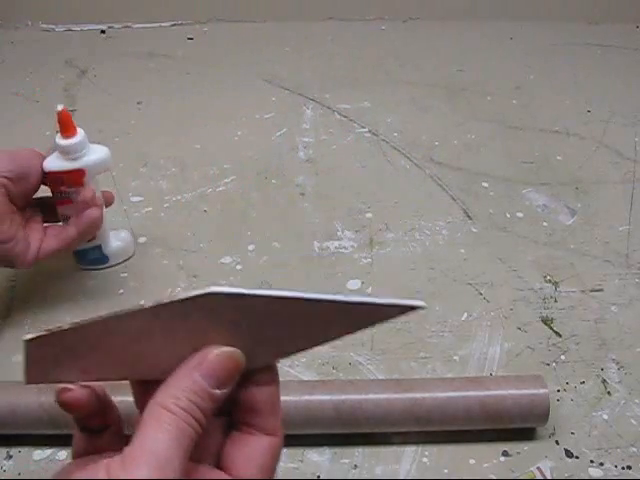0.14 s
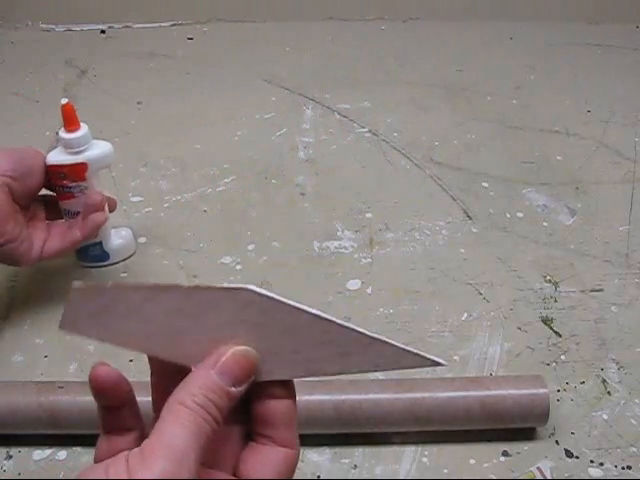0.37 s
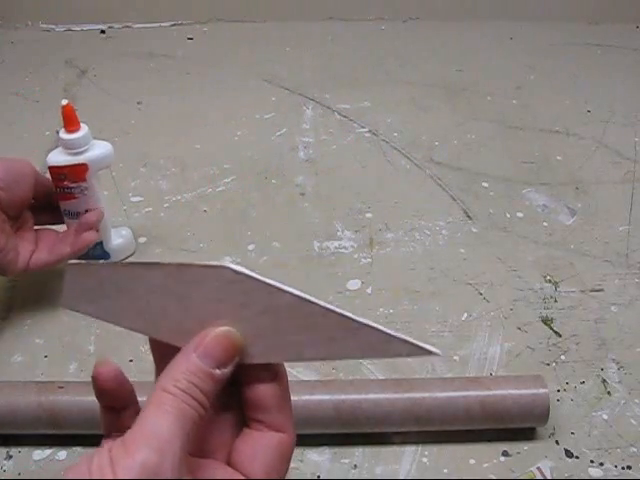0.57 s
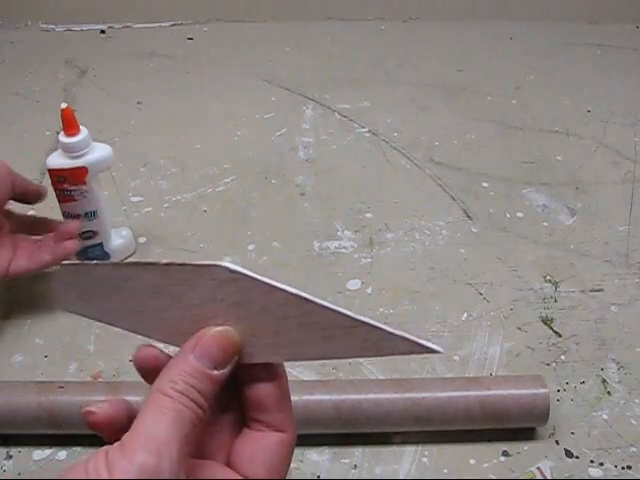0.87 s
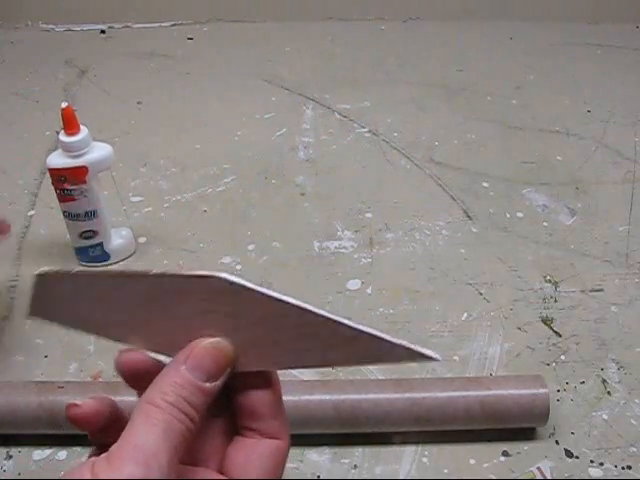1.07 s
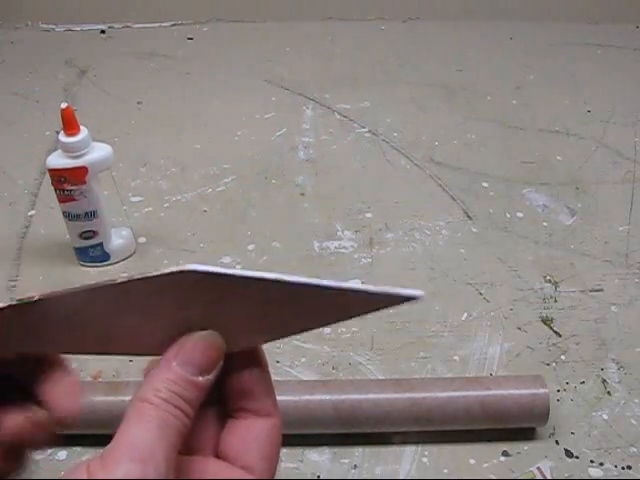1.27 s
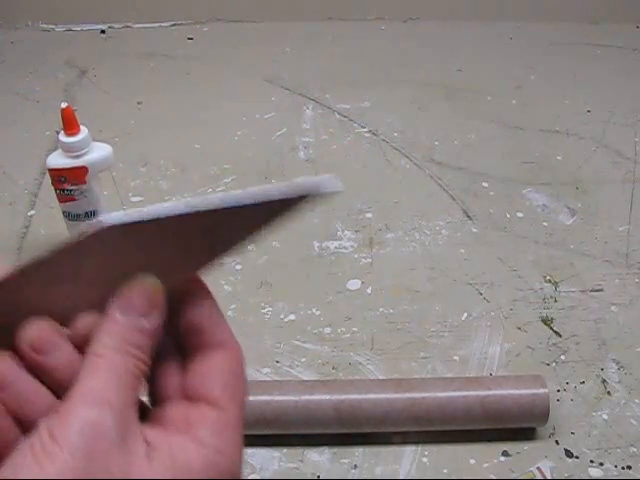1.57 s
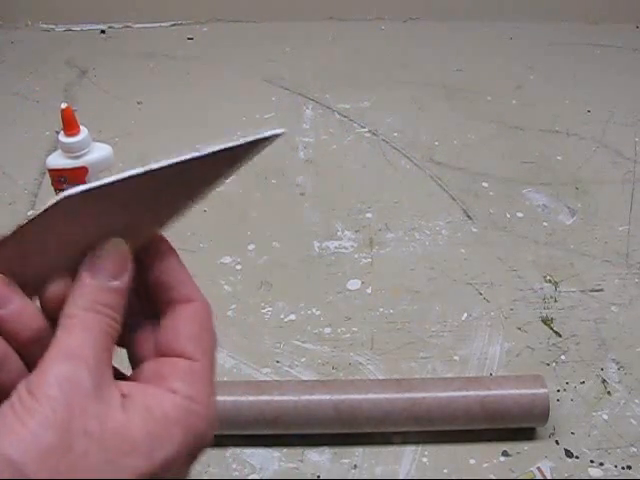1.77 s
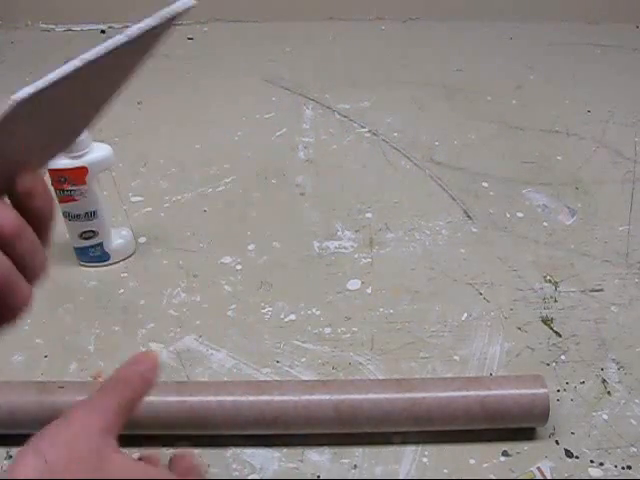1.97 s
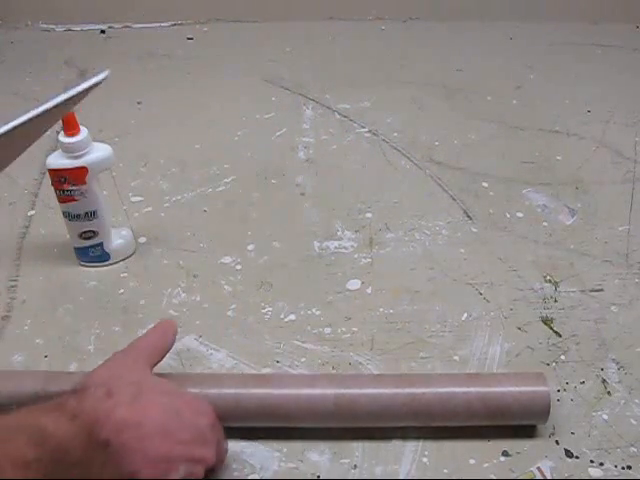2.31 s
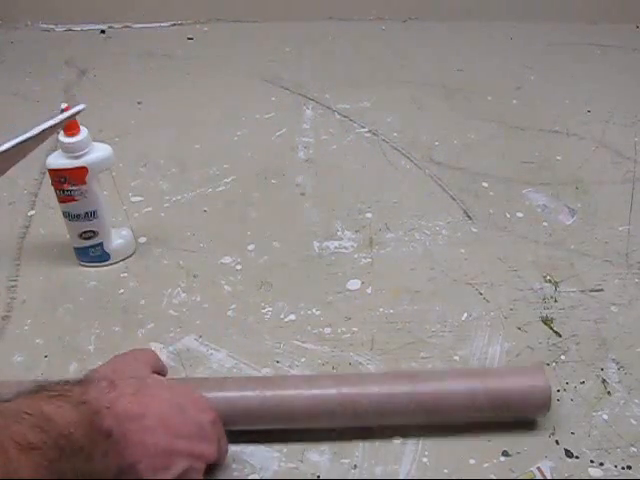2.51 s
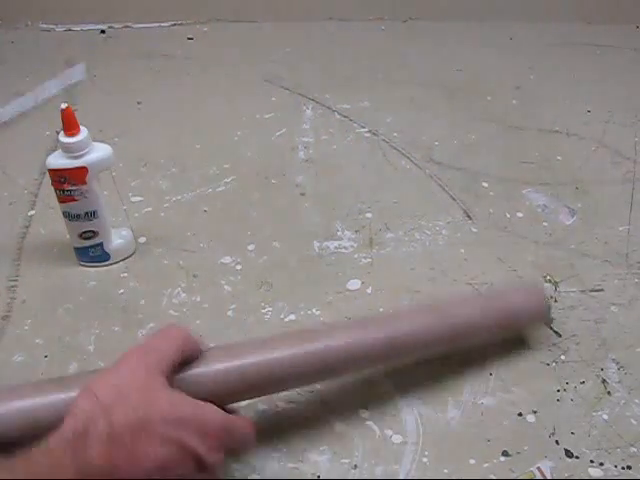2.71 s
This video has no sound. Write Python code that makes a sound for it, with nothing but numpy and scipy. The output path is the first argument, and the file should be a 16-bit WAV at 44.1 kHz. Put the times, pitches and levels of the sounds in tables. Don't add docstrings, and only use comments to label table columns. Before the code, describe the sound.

Knocks on a hard tabletop: first a bottle set down and rocking, then small nail ticks on thin wood, then hollow tube bumps with a short scrape. Faint hum, small room, close lo-fi microphone.

```python
import sys
import numpy as np
from scipy import signal
from scipy.io import wavfile
from scipy.ndimage import uniform_filter1d

SR = 44100
rng = np.random.default_rng(int(sys.argv[2]) if len(sys.argv) > 2 else 0)


def boost_factor(decibels):
    exponent = np.asarray(decibels, float) / 20
    return 10 ** exponent


def wav_out(sig):
    wavfile.write(sys.argv[1], SR, np.round(np.clip(np.atleast_2d(sig).T, -1, 1) * 32767).astype(np.int16))


N = 125685

# (frequency [Hz], density [dB per Hz])
AIR_SPECTRUM = [(30, -0.5), (100, -4), (220, -7), (450, -0.5), (700, -5.5), (1000, -11), (1850, -10.5),
                (5000, -16)]
AIR_DB, AIR_FLICKER_DB = -51.5, 0.7
# (multiple of BUZZ_HZ [1], level [dB])
HUM_PARTIALS = [(3, -65), (4, -58.5), (5, -62.5), (6, -61), (7, -71), (9, -67)]
BUZZ_HZ = 119.93
FAN_HZ, FAN_WIDTH_HZ, FAN_DB = 1813, 130, -63.5

# (time [s], level [dB], rise [s], t60 [s], centre [Hz])
FINGER_SLIPS = [(0, -50, .002, 0.67, 3820), (0.202, -34, 0.0027, 0.3, 1600),
                (0.257, -42, 0.0057, 0.075, 4880), (0.562, -43.5, 0.0019, 0.15, 2500),
                (1.283, -43, 0.001, 0.09, 4100), (1.475, -38.5, 0.0018, 0.14, 3540),
                (1.758, -43, 0.00089, 0.035, 3540), (1.766, -51, 0.0024, 0.41, 3400),
                (1.828, -48.5, 0.013, 0.5, 3560), (1.87, -40.5, 0.006, 0.062, 3230),
                (2.209, -43.5, 0.0014, 0.11, 3290), (2.265, -43.5, 0.0079, 0.23, 4260),
                (2.4088, -33.5, 0.00086, 0.017, 3240), (2.545, -39, 0.0092, .12, 5000),
                (0.297, -46.5, .004, .06, 4500), (2.4746, -38, 0.00069, 0.07, 2750),
                (2.668, -45.5, 0.0076, 0.6, 4240)]

# (time [s], level [dB], contact [ms])
BOTTLE_HITS = [(.2028, -12.5, 1.03), (.2062, -19, 1.07), (.219, -22, 1.12), (.228, -21.5, 1.1),
               (.2455, -15.5, 2), (.259, -24.5, 0.39), (.284, -24.5, 2.08), (.32, -31, 4), (.562, -36, 1.2),
               (.62, -37.5, 1.75), (.745, -38.5, 1.06), (.765, -41, 1.37), (.79, -39, 1.46)]
# (frequency [Hz], level [dB], t60 [s])
TABLE_MODES = [(44.5, -36.5, 0.25), (92.2, -14.5, 0.15), (122.7, -5.5, 0.24), (165.4, -1, 0.17),
               (216.6, -10, 0.054), (255.3, -2, .09), (296.8, -10, 0.1), (377.4, -3, 0.082),
               (420, -4, 0.07), (512, -8, .09), (598.6, -5, 0.2), (652, -2.5, 0.096), (869, -10, 0.094),
               (1200, -5.5, 0.031)]
# (time [s], level [dB], contact [ms])
ROCKING_NUDGES = [(.308, -36, 5.2), (.34, -35.5, 5.8), (.365, -42, 5.1), (.42, -39, 4.8), (.487, -36, 5),
                  (.53, -43.5, 5.2), (.556, -39, 4.5), (.593, -31, 4.9), (.612, -37, 3.1), (.636, -41, 3.5),
                  (.672, -40.5, 4.4), (.716, -37.5, 4.9), (.742, -41, 2.7), (.759, -34, 4.2), (.785, -39, 3.2),
                  (.815, -36.5, 4.8), (.86, -42.5, 6), (.89, -44.5, 7.6), (.95, -47, 7.2)]
# (frequency [Hz], level [dB], t60 [s])
SWAY_MODES = [(48.2, -15.5, 0.25), (70, -16, 0.086), (95, 0, 0.16), (122, -3.5, .16), (168, -3, 0.1),
              (235, -1, 0.09), (330, -1, .07)]
# (time [s], level [dB], frequency [Hz], t60 [s])
TABLE_SWELLS = [(.204, -14, 385, 0.067), (0.209, -20, 168, 0.093), (.212, -27.5, 604, .1),
                (.228, -18, 252.5, 0.14), (.266, -24.5, 251.5, 0.055), (.278, -25, 165.2, 0.11),
                (.285, -35.5, 615, .09), (.315, -35, 54.7, 0.32), (0.317, -31.5, 122, 0.11),
                (.36, -40, 161.3, 0.088), (.39, -36, 117.8, 0.29), (0.753, -35.5, 340.5, .08),
                (.558, -39.5, 410.5, 0.091), (.565, -38, 235, .1), (.601, -31, 94, .17),
                (.763, -30, 96, .17)]
# (time [s], level [dB], frequency [Hz], t60 [s])
SMALL_TICKS = [
    (0.3927, -26, 410, 0.028),
    (1.2812, -30, 3500, 0.008),
    (1.2822, -31, 4500, 0.006),
    (1.76, -41, 3700, 0.0035),
    (2.473, -30, 2480, 0.013),
    (2.8, -36, 3800, 0.028),
    (2.7, -32, 1480, 0.022),
    (0.2052, -19, 1570, 0.0045),
    (2.4072, -15, 800, .006),
]

# (time [s], level [dB])
SLEEVE_LEVEL = [
    (1.65, -70),
    (1.78, -57.5),
    (1.9, -54.5),
    (2.05, -54.5),
    (2.2, -52),
    (2.4, -52),
    (2.6, -54.5),
    (2.85, -56.5),
]

# (time [s], level [dB], contact [ms])
TUBE_HITS = [(2.205, -19.5, 0.2), (2.2092, -28.5, 0.68), (2.2146, -29, 1.6), (2.2255, -22.5, 1.67),
             (2.272, -37, 0.68), (2.4073, -14, 0.25), (2.4125, -30, 1.1), (2.42, -17.5, 2.1),
             (2.435, -27.5, 1.23), (2.49, -24, 1.5), (2.535, -23.5, 1.2), (2.547, -33, 0.36),
             (2.559, -24, 0.45), (2.568, -28, 1.6), (2.583, -28, 3.7), (2.6, -29, 2.7)]
# (frequency [Hz], level [dB], t60 [s])
TUBE_MODES = [(268.6, -4, 0.06), (351.4, -1.5, 0.12), (422, -13.5, 0.074), (519, -11, 0.07),
              (630, -5, 0.058), (710, -0.5, .035), (793, -3, 0.057), (950, -3.5, 0.0084),
              (1090, -10, 0.035), (1512, -16.5, 0.035), (1575, -24.5, 0.018), (2500, -20, 0.0085),
              (3410, -48, .02)]
# (time [s], level [dB])
DRAG_PRESSURE = [(2.19, -74), (2.21, -40), (2.3, -48.5), (2.38, -43.5), (2.42, -43), (2.465, -82.5),
                 (2.49, -42), (2.52, -36), (2.562, -32.5), (2.58, -43), (2.625, -54.5), (2.74, -57.5),
                 (2.85, -44.5)]
DRAG_RATE_HZ, DRAG_SCATTER_DB, DRAG_INTO_TUBE_DB = 5400, 2, -3
# (time [s], level [dB], contact [ms])
GRIP_PUMPS = [(2.228, -39, 2.7), (2.255, -42.5, 3), (2.393, -42, 3.6), (2.432, -35.5, 1.8),
              (2.455, -44, 2.5), (2.478, -36.5, 1.9), (2.49, -33, 3.4), (2.53, -39, 2.8),
              (2.546, -34.5, 2.4), (2.558, -31, 2.6), (2.58, -34, 2.5), (2.597, -34.5, 2.8),
              (2.618, -39.5, 2.7), (2.66, -45.5, 4), (2.69, -46, 4.4)]
# (frequency [Hz], level [dB], t60 [s])
HOLLOW_MODES = [(86, -25, 0.077), (114, -13.5, 0.22), (168.9, -1.5, 0.13), (197.3, -5, 0.11),
                (239.4, -8, .08)]
TUBE_LOW_HZ, HOLLOW_LOW_HZ = 196, 88.6
# (time [s], level [dB], frequency [Hz], t60 [s])
TUBE_SWELLS = [(2.211, -27, 250, .12), (2.216, -28, 352.3, .1), (2.222, -36, 117.6, 0.27),
               (2.268, -37, 430, 0.072), (2.297, -39, 390, .12), (2.39, -39.5, 151, 0.095),
               (2.411, -26.5, 248, 0.13), (2.42, -28.5, 350, 0.12), (2.416, -32.5, 820, .1),
               (2.446, -35.5, 392.5, .08), (2.41, -33, 115.6, .3), (2.408, -32, 1160, 0.088),
               (2.418, -31, 1052, .06), (2.406, -23.5, 580, .05), (2.478, -31.5, 260, 0.046),
               (2.478, -38, 622, .06), (2.481, -28.5, 115.1, 0.17), (2.507, -31, 271, .1),
               (2.522, -36, 1165, 0.14), (2.531, -19, 280, 0.078), (2.532, -29, 500, .15),
               (2.548, -28, 516.4, 0.12), (2.536, -29.5, 114, 0.46), (2.549, -24, 170.7, .12),
               (2.578, -25, 185, .1), (2.596, -27, 200, .12), (2.549, -28.5, 770, .1),
               (2.562, -29.5, 830, .08), (2.665, -44.5, 114, 0.38)]

SPOT_SCATTER_DB, SPOT_DETUNE, RATTLE_T60_S = 4.5, 0.02, 0.09
SWELL_RISE_S = 0.005
ROOM_T60_S, ROOM_TOP_HZ, ROOM_DB = 0.35, 2990, -18
INPUT_TOP_HZ, INPUT_LOW_HZ = 5670, 76.2
STEP, OFFSET_STEPS = 0.00545, 0.86
THINNING, SMOOTH_BETA = 4, 7.9
MIRROR_DB, MIRROR_GATE_DB = -53, -34
MIRROR_HZ, MIRROR_FROM_HZ = (9300, 15300), 1300


def unit(x):
    return x / np.sqrt(np.mean(x ** 2))


def band(x, hz, width_hz):
    return signal.lfilter(*signal.iirpeak(hz, hz / width_hz, fs=SR), x)


def filtered(x, order, hz, kind):
    return signal.sosfilt(signal.butter(order, hz, kind, fs=SR, output="sos"), x)


def curve(rows):
    rows = np.array(rows)
    return boost_factor(np.interp(np.arange(N) / SR, rows[:, 0], rows[:, 1], left=-120))


def walk(rate_hz):
    k = int(SR / rate_hz)
    steps = np.repeat(rng.standard_normal(N // k + 1), k)
    return unit(uniform_filter1d(uniform_filter1d(steps, k), k)[:N])


def grit(rate_hz, scatter_db):
    c = rng.random((3, N))
    clicks = (c[0] < rate_hz / SR) * np.sign(c[1] - 0.5)
    return unit(clicks * boost_factor(-scatter_db * np.log(1 - c[2])))


def ring(push, modes):
    out = 0
    for hz, db, t60_s in modes:
        r = np.exp(-np.log(1000) / (t60_s * SR))
        w = 2 * np.pi * hz / SR
        out = out + boost_factor(db) * signal.lfilter([0, r * np.sin(w)], [1, -2 * r * np.cos(w), r * r], push)
    return out


def pulse(t, ms):
    return -np.sin(np.pi * np.clip(t / (ms / 1000), 0, 1)) ** 2 / (ms * SR / 2000)


def contacts(rows):
    t = np.arange(N) / SR
    return sum(boost_factor(db) * pulse(t - s, ms) for s, db, ms in rows)


def knocks(rows, modes, rattle_db):
    t = np.arange(SR // 4) / SR
    out, modes = np.zeros(N + SR), np.array(modes)
    for s, db, ms in rows:
        i = int(s * SR)
        c = rng.standard_normal((len(modes), 3))
        hz = modes[:, :1] * (1 + SPOT_DETUNE * c[:, :1])
        size = boost_factor(modes[:, 1:2] + SPOT_SCATTER_DB * c[:, 1:2])
        decay = boost_factor(-60 * t / modes[:, 2:])
        body = np.sum(size * decay * np.sin(2 * np.pi * hz * t + 0.6 * c[:, 2:]), axis=0)
        push = pulse(t, ms)
        loose = rng.standard_normal(len(t)) * boost_factor(rattle_db - 60 * t / RATTLE_T60_S) / np.sqrt(0.0088 * SR)
        force = push + signal.fftconvolve(push, loose)[:len(t)]
        out[i:i + len(t)] += boost_factor(db) * signal.fftconvolve(force, body)[:len(t)]
    return out[:N]


def swells(rows):
    t, out = np.arange(N) / SR, 0
    for s, db, hz, t60_s in rows:
        u = np.maximum(t - s, 0)
        env = boost_factor(db - 60 * u / t60_s) * (1 - np.exp(-u / SWELL_RISE_S))
        out = out - env * np.sin(2 * np.pi * hz * u)
    return out


def air():
    out, points = 0, np.array(AIR_SPECTRUM)
    for hz in 35 * 2 ** np.arange(0, 7.6, 0.5):
        db = np.interp(np.log(hz), np.log(points[:, 0]), points[:, 1]) + AIR_FLICKER_DB * walk(8)
        noise = band(rng.standard_normal(N), hz, hz / 2)
        out = out + boost_factor(db) * band(noise, hz, hz / 2)
    t, hum = np.arange(N) / SR, 0
    for k, db in HUM_PARTIALS:
        level = boost_factor(db + 1.5 + 0.71 * walk(3.6))
        hum = hum + level * np.sin(2 * np.pi * (k * BUZZ_HZ * t + rng.random()))
    fan = unit(band(rng.standard_normal(N), FAN_HZ, FAN_WIDTH_HZ)) * boost_factor(FAN_DB + 1.7 * walk(4.3))
    return unit(out) * boost_factor(AIR_DB) + hum + fan


def fingers():
    t, out, skin = np.arange(N) / SR, 0, grit(8000, 0.95)
    for s, db, rise_s, t60_s, hz in FINGER_SLIPS:
        u = np.maximum(t - s, 0)
        env = np.minimum(u / rise_s, 1) * boost_factor(db - 60 * np.maximum(u - rise_s, 0) / t60_s)
        slip = skin * env
        out = out + 2.6 * band(slip, hz, 0.75 * hz) + 1.0 * band(slip, 0.39 * hz, 0.6 * hz)
    return out


def bottle():
    landing = 0.4 * knocks(BOTTLE_HITS, TABLE_MODES, rattle_db=-9.5)
    sway = ring(contacts(ROCKING_NUDGES), SWAY_MODES)
    return landing + sway + swells(TABLE_SWELLS)


def ticks():
    t, out = np.arange(N) / SR, 0
    for s, db, hz, t60_s in SMALL_TICKS:
        env = boost_factor(db - 60 * np.abs(t - s) / t60_s)
        out = out - env * np.sin(2 * np.pi * hz * np.maximum(t - s, 0))
    return out


def sleeve():
    rustle = grit(6000, 0.9) * curve(SLEEVE_LEVEL) * boost_factor(3.1 * walk(15))
    return 10.0 * band(rustle, 400, 180) + 2.7 * band(rustle, 1880, 300) + 1.7 * band(rustle, 1100, 860)


def tube():
    rub = grit(DRAG_RATE_HZ, DRAG_SCATTER_DB) * curve(DRAG_PRESSURE) * boost_factor(2.0 * walk(40))
    skin = 1.78 * band(rub, 3600, 5000) + 2.7 * band(rub, 1700, 600) + 4.3 * band(rub, 1145, 70)
    hits = filtered(knocks(TUBE_HITS, TUBE_MODES, rattle_db=-19.0), 3, TUBE_LOW_HZ, "high")
    hollow = filtered(ring(contacts(GRIP_PUMPS), HOLLOW_MODES), 2, HOLLOW_LOW_HZ, "high")
    dragged = ring(0.025 * boost_factor(DRAG_INTO_TUBE_DB) * rub, TUBE_MODES)
    return 0.35 * hits + dragged + hollow + skin + swells(TUBE_SWELLS)


def mirror(x):
    treble = filtered(x, 4, MIRROR_FROM_HZ, "high")
    loud = uniform_filter1d(treble ** 2, size=700) > boost_factor(2 * MIRROR_GATE_DB)
    gate = uniform_filter1d(1.0 * loud, size=300)
    image = THINNING * treble * (np.arange(N) % THINNING == 0) * gate
    return boost_factor(MIRROR_DB) * filtered(image, 6, MIRROR_HZ, "band")


def scene():
    near = fingers() + bottle() + ticks() + tube()
    t = np.arange(SR // 2) / SR
    tail = rng.standard_normal(len(t)) * boost_factor(-60 * t / ROOM_T60_S) * (t > 0.004)
    tail = signal.lfilter(*signal.butter(1, ROOM_TOP_HZ, fs=SR), tail)
    wet = signal.fftconvolve(near, tail / np.sqrt(np.sum(tail ** 2)))[:N]
    return (near + boost_factor(ROOM_DB) * wet + sleeve() + air())[None]


def band_limit(x):
    return signal.sosfilt(signal.butter(12, 15400, fs=SR, output="sos"), x)


def record(dry):
    x = filtered(dry[0], 4, INPUT_TOP_HZ, "low")
    x = filtered(x, 2, INPUT_LOW_HZ, "high")
    held = np.zeros(N)
    held[::THINNING] = STEP * (np.round(x[::THINNING] / STEP + OFFSET_STEPS) - 1)
    kernel = signal.firwin(numtaps=45, cutoff=SR / THINNING / 2, window=("kaiser", SMOOTH_BETA), fs=SR)
    smooth = np.convolve(held, THINNING * kernel, "same")
    mix = (smooth + mirror(x) + STEP)[None]
    return band_limit(mix)


dry = scene()
out = record(dry)
wav_out(out)
```